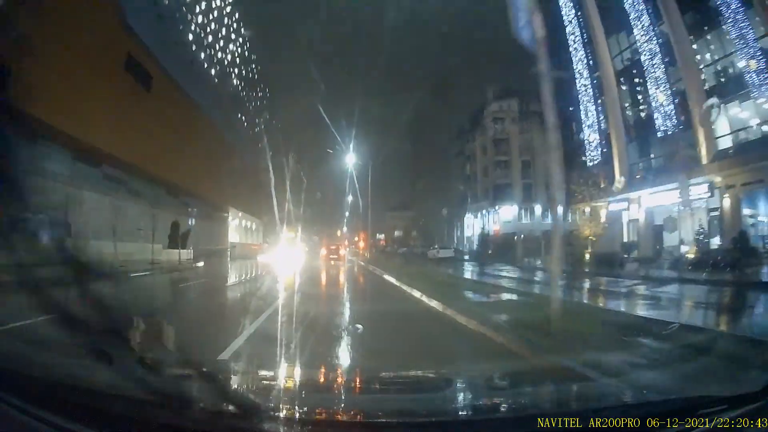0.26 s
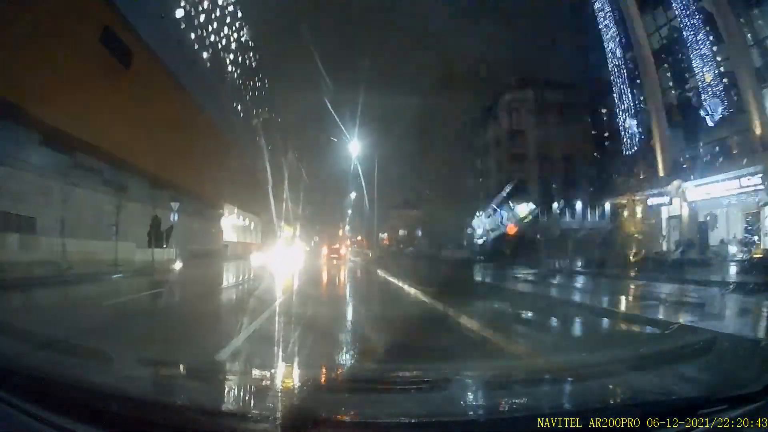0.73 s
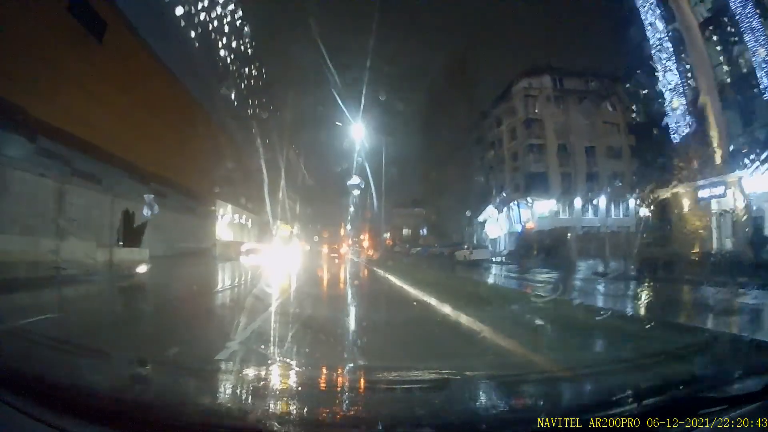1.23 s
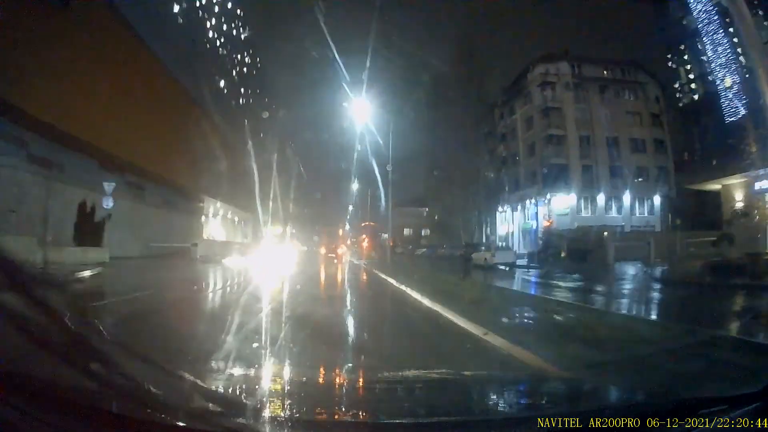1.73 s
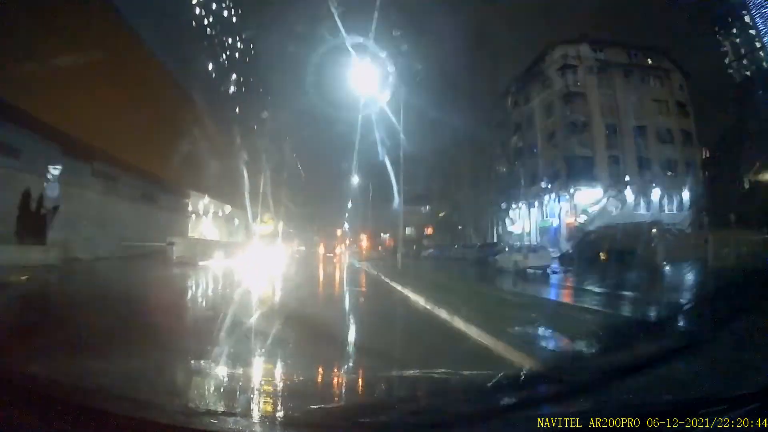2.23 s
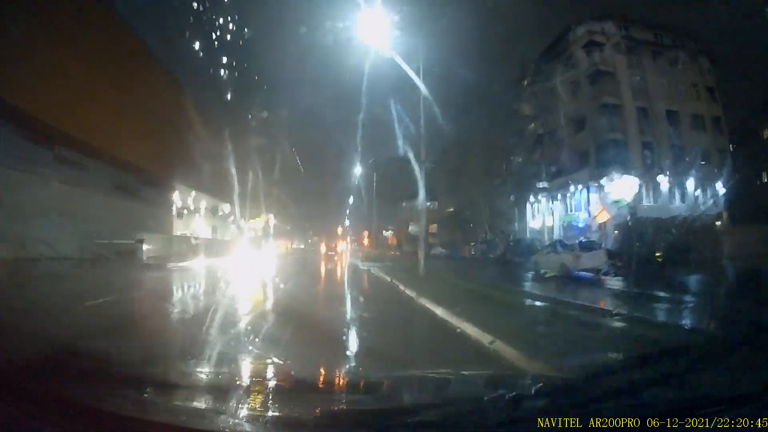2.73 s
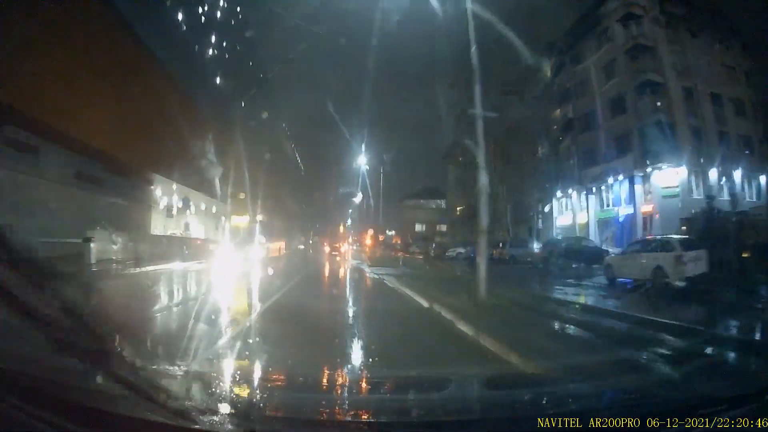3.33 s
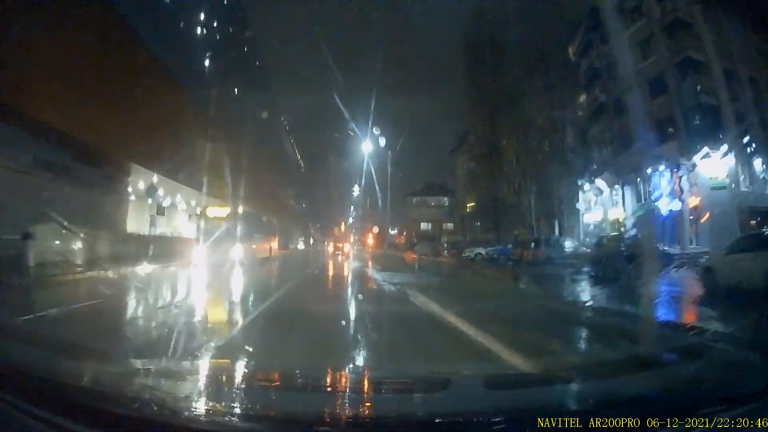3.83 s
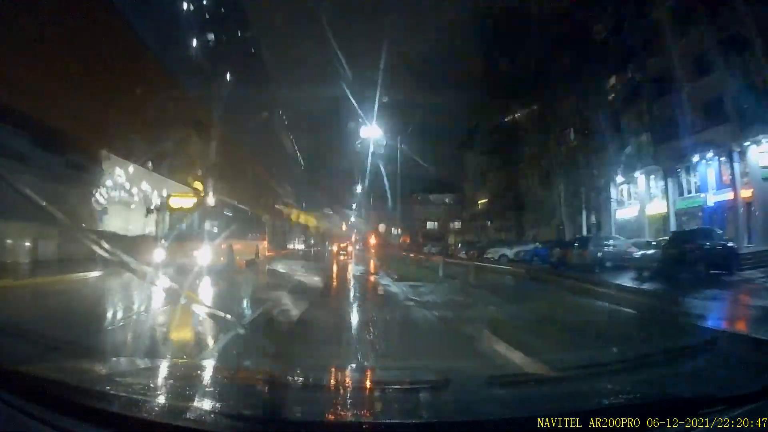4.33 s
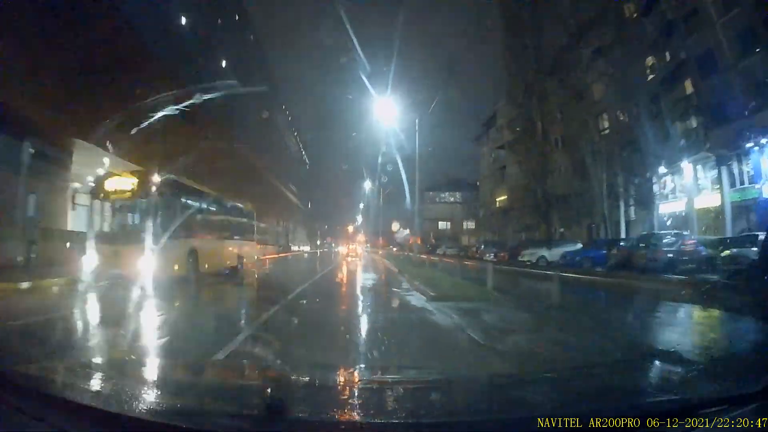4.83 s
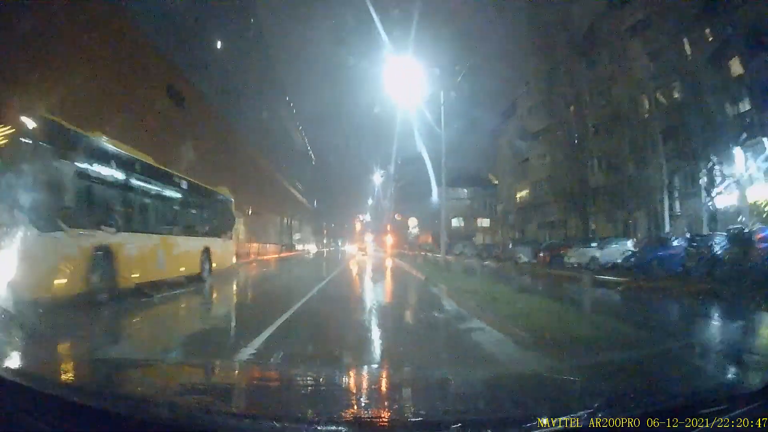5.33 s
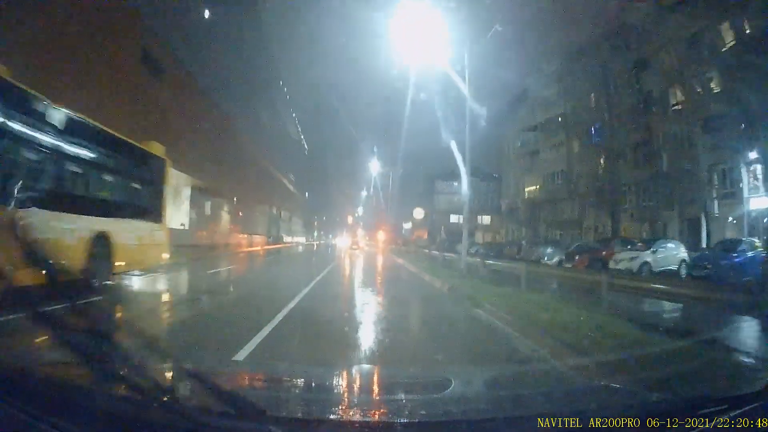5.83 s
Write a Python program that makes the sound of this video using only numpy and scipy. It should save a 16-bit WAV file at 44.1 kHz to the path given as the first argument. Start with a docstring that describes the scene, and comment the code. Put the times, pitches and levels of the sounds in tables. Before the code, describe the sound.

Inside a car in light rain, wiper blades drag with juddering squeaks and short grunts above steady road rumble.

```python
"""Inside a car on a wet street, engine boom, tyre rumble and light rain sound throughout. At the start a wiper
blade chatters on the windscreen by stick-slip friction, then grunts as it flips. At one second a sharp click
sounds. Four more drags follow, about 1.4 s apart: each chatters, locks into a rising squeak as the slips fall
into step, and ends in a grunt. Near four seconds a rougher stretch of road swells the rumble."""
import sys
import numpy as np
from scipy import signal
from scipy.fft import rfft, irfft, next_fast_len
from scipy.io import wavfile
from scipy.ndimage import uniform_filter1d, map_coordinates

SR = 44100
rng = np.random.default_rng(int(sys.argv[2]) if len(sys.argv) > 2 else 0)


def put_to_file(sound):
    """Save the sound as 16-bit audio at rate SR, in the file named by the first command-line argument."""
    columns = np.atleast_2d(sound).T  # one column per channel
    safe = np.clip(columns, -1, 1)
    whole_steps = np.round(safe * 32767)
    wavfile.write(sys.argv[1], SR, whole_steps.astype(np.int16))


N = 267687
TIME = np.arange(N) / SR


def amp(db):
    """Decibels to amplitude ratio."""
    return 10 ** (np.asarray(db) / 20)


def along(points, hz):
    """Interpolation of (Hz, value) points on a logarithmic frequency axis."""
    f, v = np.transpose(points)
    return np.interp(np.log(hz + 1), np.log(f + 1), v)


def curve(points):
    """Linear interpolation of (seconds, value) points at every sample."""
    return np.interp(TIME, *np.transpose(points))


def wobble(rate):
    """Smooth random modulation through rate knots a second."""
    knots = rng.standard_normal(int(N * rate / SR) + 4)
    at = np.arange(0, len(knots) - 1, 1 / 8)
    return np.interp(TIME * rate, at, map_coordinates(knots, [at]))


def filtered(x, response):
    """Zero-phase filtering: the spectrum is multiplied by a response."""
    size = next_fast_len(N + SR // 2)
    return irfft(rfft(x, size) * response(np.fft.rfftfreq(size, 1 / SR)), size)[:N]


def lowpass(x, hz, order):
    """Butterworth roll-off above hz."""
    return filtered(x, lambda f: 1 / np.sqrt(1 + (f / hz) ** (2 * order)))


def noise(spectrum):
    """Coloured noise of rms 1 with the given (Hz, dB) spectrum."""
    x = filtered(rng.standard_normal(N), lambda hz: amp(along(spectrum, hz)))
    return x / np.sqrt(np.mean(x ** 2) + 1e-20)


def ring(x, response, size=8192):
    """Resonance: x excites a minimum-phase filter with the given (Hz, dB) response."""
    cepstrum = irfft(np.log(amp(along(response, np.fft.rfftfreq(size, 1 / SR)))))
    cepstrum[1:size // 2] *= 2
    cepstrum[size // 2 + 1:] = 0
    return signal.fftconvolve(x, irfft(np.exp(rfft(cepstrum))))[:N]


def steady(x, size=900):
    """Division by the running rms holds the level near 1."""
    power = uniform_filter1d(uniform_filter1d(x ** 2, size), size)
    return x / np.sqrt(np.abs(power) + 1e-12)


def impulses(rows):
    """One impulse for each row that begins with (seconds, dB)."""
    seconds, db = np.transpose(rows)[:2]
    return np.bincount(np.round(seconds * SR).astype(int), amp(db), N)


def pulse_train(rate, jitter, shimmer_db):
    """Impulses at rate Hz, scattered in time (jitter, in cycles) and in size (shimmer)."""
    at = np.flatnonzero(np.diff(np.floor(np.cumsum(rate) / SR)))
    chance = rng.standard_normal((len(at), 2))
    at = np.clip(at + jitter * chance[:, 0] * SR / rate[at], 0, N - 1).astype(int)
    return np.bincount(at, amp(shimmer_db * chance[:, 1]), N)


# Cabin decay. Each row: frequency in Hz, reverberation time in seconds.
CABIN_T60 = [(200, 0.064), (1000, 0.074), (4000, 0.024)]
def cabin(x, wet_db):
    """Reverberation: dense reflections add a short, exponentially decaying tail."""
    hz, t, spectra = signal.stft(rng.standard_normal(SR // 4), SR, nperseg=256)
    decay = amp(-60 * t / along(CABIN_T60, hz)[:, None])
    tail = signal.istft(spectra * decay, SR, nperseg=256)[1]
    return x + amp(wet_db) * signal.fftconvolve(x, tail / np.linalg.norm(tail))[:N]


# Spectra of body shake and tyre noise. Each row: frequency in Hz, relative level in dB.
SHAKE_SPECTRUM = [(10, -18.5), (22, 4), (32, 0.5), (44, 1), (62, -4.5), (85, -8.5), (130, -13.5),
                  (180, -29), (300, -57), (900, -110)]
TYRE_SPECTRUM = [(80, -38.5), (130, -2), (177, -8.5), (230, -9.5), (390, -8.5), (590, -13.5), (710, -13.5),
                 (880, -19.5), (1050, -16.5), (1300, -23.5), (1680, -35), (2970, -38), (3750, -41),
                 (4300, -46.5), (6000, -110)]
def road():
    """Random excitation: bumps shake the body while the tyres rush over wet asphalt."""
    shake, rush = noise(SHAKE_SPECTRUM), noise(TYRE_SPECTRUM)
    rough_stretch_db = 4.5 * np.exp(-((TIME - 4.1) / .35) ** 2)
    shake_db = -20.5 + rough_stretch_db + 2 * wobble(4.3)
    rush_db = -32.5 + .9 * wobble(9.9)
    return amp(shake_db) * shake + amp(rush_db) * rush


# Engine speed. Each row: time in seconds, firing rate in Hz.
FIRING_RATE = [(0, 48.25), (1, 50.97), (2, 54.12), (3, 55.88), (3.7, 55.04), (4.5, 55.14), (5.2, 54.45),
               (6.07, 54.15)]
# Envelopes of the firing tone, its octave and the whine. Each row: time in seconds, level in dB.
BOOM_LEVEL = [(0.0, -11), (0.17, -9.5), (1.51, -16), (1.55, -32), (1.61, -19.5), (1.9, -29.5),
              (2.15, -13.5), (3.73, -11), (5.08, -14.5), (5.11, -29), (5.28, -17.5), (5.35, -32),
              (5.41, -22), (5.71, -34), (5.75, -37), (5.81, -17), (5.95, -28), (5.98, -16.5)]
OCTAVE_LEVEL = [(0, -26), (1.1, -27.5), (1.6, -24.5), (4.2, -29), (6.07, -33)]
WHINE_LEVEL = [(0, -55.5), (.6, -42), (1.6, -43), (2.2, -52), (6.07, -62.5)]
# Weaker orders. Each row: multiple of the firing rate, level in dB relative to the octave.
ENGINE_ORDERS = [(1.5, -18.5), (2.5, -13.5), (3, -24.5), (4, -21)]
def engine():
    """Forced vibration: periodic firing drives a boom, with higher orders and a whine locked to it."""
    firing_hz = curve(FIRING_RATE) * (1 + .004 * wobble(7.3))
    phase = 2 * np.pi * np.cumsum(firing_hz) / SR
    boom = amp(curve(BOOM_LEVEL) + .22 * wobble(18)) * np.sin(phase)
    orders = sum(amp(db + 2 * wobble(4.9)) * np.sin(k * phase) for k, db in ENGINE_ORDERS)
    upper = amp(curve(OCTAVE_LEVEL)) * (np.sin(2 * phase) + orders)
    whine_tone = np.sin(14 * phase + .4 * wobble(25))
    whine = amp(curve(WHINE_LEVEL) + 3.6 * wobble(7.5)) * whine_tone
    return np.sqrt(2) * (boom + upper + whine)


# Larger raindrops. Each row: time in seconds, relative level in dB.
LARGE_DROPS = [(1.5993, -28), (1.7459, -27), (3.2839, -26.5), (3.5229, -23), (3.8217, -23), (4.8269, -26.5),
               (5.0769, -24.5)]
# Response of the glass to a tap. Each row: frequency in Hz, gain in dB.
GLASS_TICK = [(500, -16), (1200, 0.5), (2200, -1.5), (3000, 7.5), (3800, -1), (4600, -42.5), (7000, -89.5)]
def rain(drops_per_s=130):
    """Impact excitation: many small drops and a few large ones make the windscreen ring briefly."""
    patter = pulse_train(drops_per_s * np.exp(.46 * wobble(8)), jitter=1, shimmer_db=6.5)
    impacts = amp(7.5) * impulses(LARGE_DROPS) + amp(-31) * patter
    return cabin(ring(impacts, GLASS_TICK), wet_db=-6.5)


# A sharp click. Each row: time in seconds, step height in dB.
SHARP_CLICK = [(1.0203, -8.5)]
def click(decay_s=.0058):
    """A broadband transient: a sudden step relaxes exponentially."""
    return sum(amp(db) * (TIME >= at) * np.exp(-np.abs(TIME - at) / decay_s) for at, db in SHARP_CLICK)


# Blade reversals. Each row: loudest moment in seconds, level in dB, length in seconds.
BLADE_FLIPS = [(0.206, -23, 0.044), (1.582, -23.5, 0.045), (2.965, -19, 0.039), (4.35, -22, 0.052),
               (5.74, -21, 0.058)]
# Resonances of the grunt. Each row: frequency in Hz, relative gain in dB.
GRUNT_RESPONSE = [(120, -46), (200, -9), (405, -5), (540, 0.5), (655, -4), (793, 4), (972, -10.5),
                  (1210, -8.5), (1480, -27.5), (1650, -29.5), (2170, -39.5), (3030, -36), (3500, -51.5),
                  (4550, -75.5), (7700, -120)]
def flip(slip_hz=260):
    """Slow stick-slip: the rubber lip folds over in uneven slips, a grunt that swells and fades."""
    swell = sum(amp(db) * np.exp(-(2 * (TIME - at) / length) ** 2) for at, db, length in BLADE_FLIPS)
    slips = pulse_train(slip_hz * np.exp(.13 * wobble(60)), jitter=.12, shimmer_db=4)
    return swell * steady(cabin(ring(slips, GRUNT_RESPONSE), wet_db=-2), size=500)


# Resonances of the blade and its arm. Each row: frequency in Hz, relative gain in dB.
ARM_RESPONSE = [(150, -18.5), (220, -5), (310, 0.5), (380, -6.5), (470, -3), (580, -10), (740, 6),
                (900, -9), (1050, -3.5), (1280, -7.5), (1550, -22.5), (2100, -20.5), (2450, -34.5),
                (3000, -32.5), (3900, -38), (5500, -80)]
# The rubber catches. Each row: time in seconds, relative snap level in dB, surge of the squeak in dB.
BLADE_SNAGS = [(1.2276, -13.5, 1.5), (2.6514, -15, 4), (2.7437, -11, 1), (2.8344, -26, 3.5),
               (3.9854, -24, 4), (4.0246, -14, 0), (4.0912, -17, 6)]
def snags():
    """Elastic release: gripping rubber snaps free, knocking the blade and ticking on the glass."""
    blows = impulses(BLADE_SNAGS)
    knock = amp(28) * ring(blows, ARM_RESPONSE)
    tick = amp(.5) * ring(blows, GLASS_TICK)
    return cabin(knock + tick, wet_db=-6)


def grip(half_width_s=.02):
    """Greater friction drives the squeak harder: a surge of gain around each snag."""
    return amp(sum(db * np.exp(-((TIME - at) / half_width_s) ** 2) for at, _, db in BLADE_SNAGS))


def chatter(slip_hz):
    """Irregular stick-slip: the hopping blade excites the arm's resonances with clumps of slips."""
    hops = amp(4.1 * wobble(130))
    slips = pulse_train(slip_hz * np.exp(.15 * wobble(90)), jitter=.3, shimmer_db=2.5)
    return steady(cabin(ring(hops * slips, ARM_RESPONSE), wet_db=-12))


# Windscreen and cabin as the singing rubber drives them. Each row: frequency in Hz, relative gain in dB.
GLASS_RESPONSE = [(200, -24.5), (360, -7.5), (450, -3), (600, 14), (790, 6.5), (950, 1), (1100, -1),
                  (1320, -7.5), (1550, -21), (1780, -19), (2150, -25), (2450, -35.5), (4000, -39.5)]
def sing(slip_hz, rough, flutter_db=3.2):
    """Self-excited oscillation: periodic slips give harmonics, each fluttering as the contact moves."""
    hz = slip_hz * np.exp((.014 + .04 * rough) * wobble(170))
    phase = 2 * np.pi * np.cumsum(hz) / SR
    tone = np.zeros(N)
    for k in range(1, 7):
        level_db = along(GLASS_RESPONSE, k * hz) + flutter_db * wobble(70)
        tone += amp(level_db) * np.sin(k * phase + .49 * wobble(120))
    return steady(tone)


# Drags of the blade. Each row: start and length in seconds, level in dB, attack in seconds, fade in dB,
# chatter time and glide time in seconds, top pitch and final sag in Hz, singing roughness from 0 to 1.
BLADE_DRAGS = [(-.17, .293, -16, 0.017, 1.5, 0.29, 0.042, 481.6, 0, .4),
               (1.169, 0.32, -18.5, .012, 2.5, .085, .21, 472, 0, 0.4),
               (2.572, .293, -19.5, .011, -.5, .045, .15, 428, 45, .47),
               (3.96, .29, -16, .018, 6.5, .175, .09, 480, 0, .5),
               (5.295, .368, -14.5, 0.12, 7.5, .235, .08, 456, 6, .48)]
def drags(chatter_hz=382.4, chatter_rough=.823, release_s=.03, clear_s=.05, sag_s=.035):
    """Locking of slips: gain, slip rate and roughness as each drag chatters, then clears and rises."""
    ramp = lambda x: np.clip(x, 0, 1)
    gain, slip_hz, rough = np.zeros(N), np.full(N, chatter_hz), np.full(N, chatter_rough)
    for start, length, db, attack, fade_db, wait, glide, top_hz, sag_hz, sung_rough in BLADE_DRAGS:
        age = TIME - start
        contact = ramp(np.minimum(age / attack, 1 + (length - age) / release_s))
        locked_s = (age - wait) * (contact > 0)
        slowing = ramp(1 + (age - length) / sag_s) * (contact > 0)
        gain += contact * amp(db - fade_db * ramp(age / length))
        slip_hz += ramp(locked_s / glide) * (top_hz - chatter_hz) - slowing * sag_hz
        rough += ramp(locked_s / clear_s) * (sung_rough - chatter_rough)
    pressure = amp(2.5 * wobble(25))
    return gain * pressure, slip_hz, np.clip(rough + .1 * wobble(28), 0, .97)


def squeak():
    """Stick-slip friction: part of the lip slips in step and sings; the rest chatters out of step."""
    gain, slip_hz, rough = drags()
    voice = np.sqrt(1 - rough ** 2) * sing(slip_hz, rough) + rough * chatter(slip_hz)
    judder = amp(4.94 * rough * wobble(140))
    return gain * grip() * steady(judder * voice, size=650)


def scene():
    """Superposition: wiper, engine, road and rain add in one channel."""
    return (squeak() + snags() + flip() + engine() + road() + rain())[None]


def record(dry):
    """Saturation and band limiting: a dull microphone rounds and clips peaks, and a sharp click sounds once."""
    rounded = dry[0] / (1 + np.abs(dry[0] / .76) ** 10) ** (1 / 10)
    dull = lowpass(rounded, hz=4050, order=26)
    clipped = np.clip(dull + click(), -.705, .705)
    return lowpass(clipped, hz=15800, order=60)[None]


dry = scene()
out = record(dry)
put_to_file(out)
```